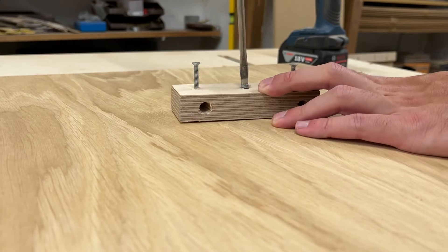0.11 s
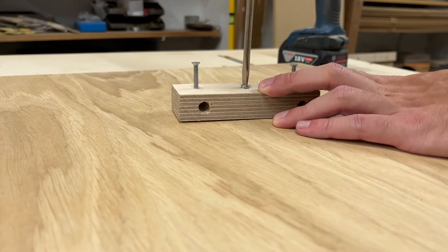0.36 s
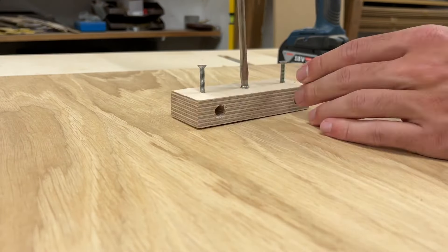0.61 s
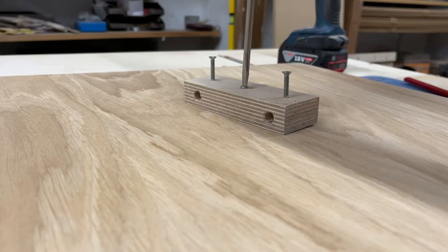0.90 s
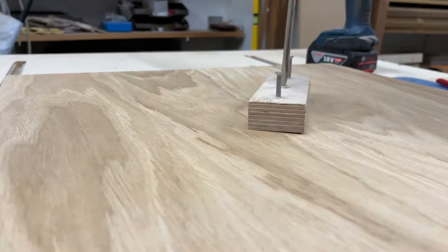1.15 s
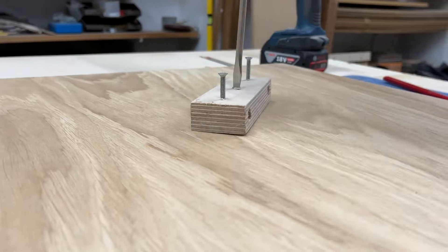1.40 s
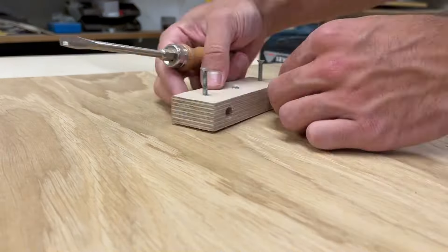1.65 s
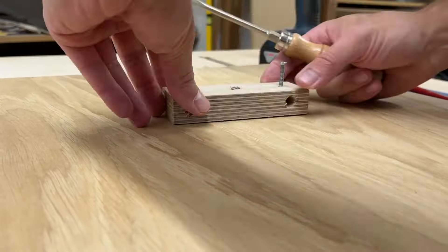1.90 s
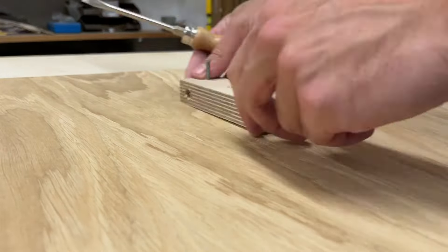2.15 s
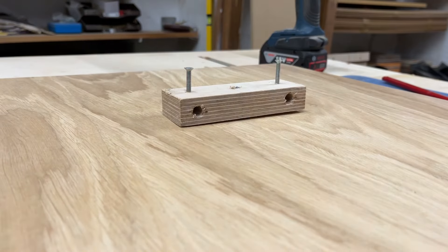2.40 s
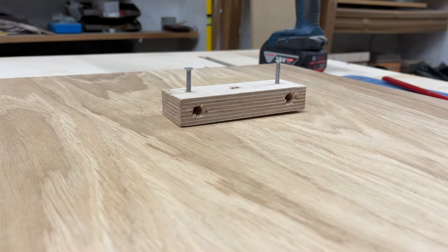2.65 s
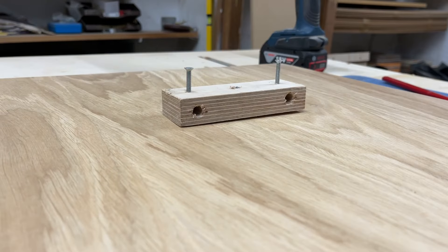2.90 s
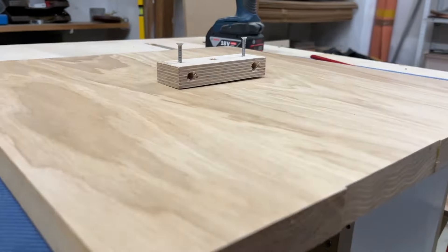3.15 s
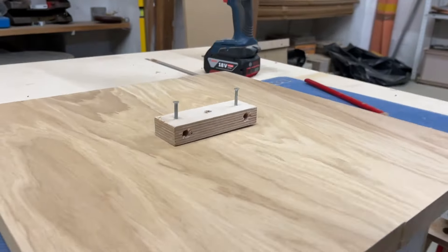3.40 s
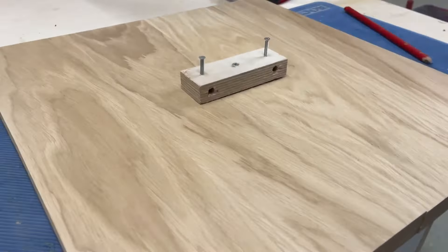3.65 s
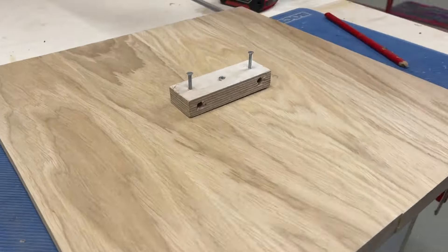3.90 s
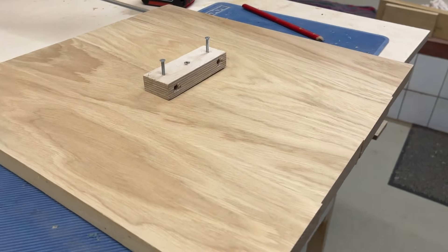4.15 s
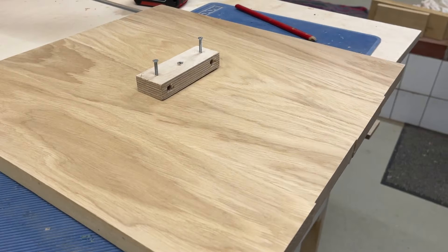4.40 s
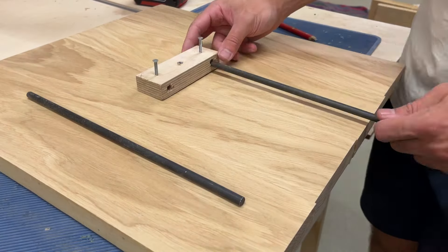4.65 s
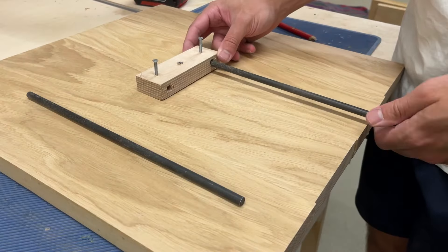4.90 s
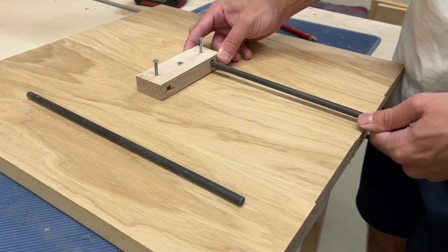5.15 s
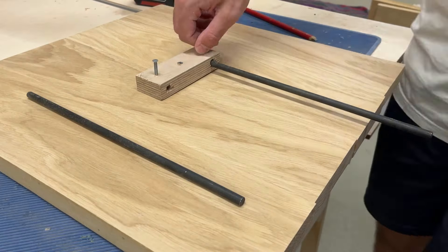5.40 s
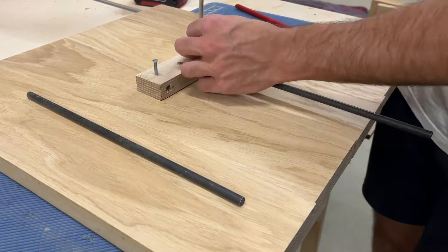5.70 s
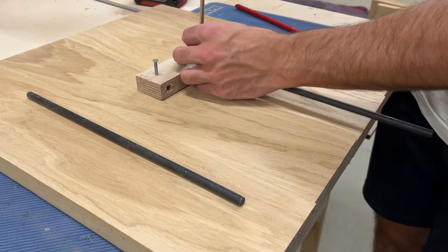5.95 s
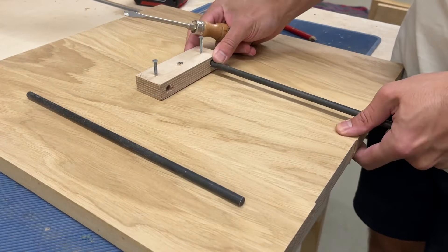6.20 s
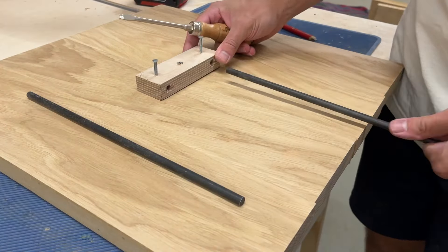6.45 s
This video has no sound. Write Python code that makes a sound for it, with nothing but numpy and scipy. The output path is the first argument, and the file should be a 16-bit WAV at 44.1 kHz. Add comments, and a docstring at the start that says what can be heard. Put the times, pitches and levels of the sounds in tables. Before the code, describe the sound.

Sped-up workshop handling: quick dry taps and knocks on a plywood block, soft hand rubs, a sharp clack, then steel rods clinking and near quiet.

```python
"""Impacts lead: tools tap and knock at a plywood block on a thick board, as filtered noise puffs. A steel rod
rings in damped bending modes; skin and wood rub in short strokes of coloured noise. A screw turns with gritty
slips through resonances, above the low shaking and jolts of the bench. The quiet workshop is heard at several
times real speed, so each blow is squeezed into a brief puff. A small stereo microphone stands on the board; its
channels agree by a different amount at each frequency."""
import sys
import numpy as np
from scipy import signal
from scipy.fft import rfft, irfft, next_fast_len
from scipy.io import wavfile
from scipy.ndimage import uniform_filter1d

SR = 44100
rng = np.random.default_rng(int(sys.argv[2]) if len(sys.argv) > 2 else 0)


def ratio_of_db(decibels):
    """Turn decibels (scalar or array-like) into linear amplitude factors; 0 dB maps to 1."""
    return 10 ** (np.asarray(decibels, float) / 20)


def inscribe(sig):
    """Save sig as 16-bit PCM at rate SR to the path in sys.argv[1].

    A 1-D sig is mono; a 2-D sig holds one channel per row.
    Samples are clipped to [-1, 1] before scaling.
    """
    pcm = np.round(np.clip(np.atleast_2d(sig).T, -1, 1) * 32767)
    wavfile.write(sys.argv[1], SR, pcm.astype(np.int16))


N = 289296  # samples

# Dull knocks of wood and knuckle; levels are relative, the thud of the board to its own blow
# [t/s, level/dB, thud level/dB, main ring f/Hz, rise length/s]
WOOD_KNOCKS = [(.0596, -29.5, -8.5, 2630, 0.0012), (0.2927, -39.5, 0, 1300, 0.0048),
               (0.415, -34, 1, 660, 0.0056), (0.667, -36.5, 3.5, 594, 0.00091),
               (0.901, -43, -31.5, 1300, 0.0075), (1.231, -39.5, -2.5, 670, 0.00079),
               (1.315, -47, 10.5, 1260, 0.0026), (1.5233, -38.5, -0.5, 616, .0027),
               (2.542, -55, 19.5, 1090, 0.0065), (2.647, -54, 17, 710, 0.0022),
               (2.685, -60, 20.5, 665, 0.0011), (2.887, -29.5, -3, 1530, .017),
               (2.9024, -16, -20.5, 1060, 0.0032), (2.9125, -21, -5, 1165, 0.003),
               (2.927, -28.5, -2.5, 1530, .0039), (2.932, -30.5, -7, 1100, 0.0056),
               (3.236, -43, 0.5, 760, .0047), (3.593, -61.5, 11.5, 600, 0.0033),
               (4.2394, -41.5, 9, 1770, 0.0087), (4.314, -42.5, -3, 735, .0039),
               (4.342, -46.5, -12.5, 1800, 0.0055), (4.5223, -34, -20, 1450, .011),
               (4.542, -27, -9, 1320, 0.0058), (4.5425, -25, -21.5, 2130, 0.0062),
               (4.868, -61.5, -9.5, 1450, 0.0036), (5.103, -44, -12.5, 1068, 0.0053),
               (5.695, -35, -4.5, 1360, 0.0042), (5.91, -60.5, -16.5, 844, 0.0058),
               (5.943, -55.5, -14, 1340, 0.0069), (6.241, -55, -7, 1580, 0.00059)]
# Taps of a hard edge [t/s, level/dB, thud level/dB, main ring f/Hz, rise length/s]
EDGE_TAPS = [(.0072, -19.5, -27.5, 3140, 0.0014), (0.1268, -25, -20.5, 4700, 0.00073),
             (.18, -39.5, -3.5, 1970, 0.0045), (0.2358, -38, -3, 3380, 0.004),
             (0.3548, -30.5, -3, 700, 0.001), (0.4257, -17.5, -19.5, 2590, 0.0013),
             (0.4895, -44, 8.5, 3300, 0.0043), (0.5673, -46, 5.5, 1290, 0.003),
             (0.6936, -47.5, 8, 590, 0.0046), (0.769, -52.5, 7.5, 4200, 0.0077),
             (1.0304, -48, 4, 1570, 0.0036), (1.108, -41.5, 17, 4640, 0.0024),
             (1.1921, -33, -3, 4540, 0.0032), (1.257, -44.5, -5.5, 1210, .0014),
             (1.3336, -45, 12.5, 1780, 0.0078), (1.3517, -24.5, -27.5, 2680, 0.0005),
             (1.382, -48, 1.5, 1300, 0.0081), (1.4502, -23.5, -26, 2670, 0.00032),
             (1.515, -42.5, 0.5, 1010, 0.00041), (1.895, -48.5, -34, 3560, 0.0017),
             (1.915, -46, -33, 3800, 0.0031), (2.069, -45, -15, 1490, .0058),
             (2.486, -58, -9, 4420, 0.0055), (2.805, -67, -8, 4040, 0.0048),
             (2.836, -56, 0.5, 1530, 0.0045), (3.044, -52.5, -22.5, 4620, 0.0047),
             (3.1033, -49, 13, 690, .0081), (3.15, -54.5, 13.5, 3980, .0031),
             (3.3062, -43.5, -1.5, 900, 0.003), (3.4027, -50.5, 13, 595, 0.0043),
             (3.5122, -40.5, 0, 4780, 0.0054), (3.661, -49, 8, 4400, 0.0012),
             (3.6943, -46, 7.5, 4950, 0.0037), (3.769, -60, -15, 4000, 0.00089),
             (3.7993, -36.5, -6.5, 4300, 0.0004), (3.8542, -43.5, -5, 4720, 0.00038),
             (4.041, -47.5, 11.5, 3600, 0.0056), (4.093, -46.5, 10.5, 596, 0.0038),
             (4.425, -59.5, -6.5, 4070, 0.0077), (4.5047, -52.5, -8, 3750, 0.0041),
             (4.541, -27, -32, 3930, 0.0068), (4.626, -58, -18.5, 5030, 0.0051),
             (5.141, -61.5, -15, 3020, 0.003), (5.432, -66.5, 0.5, 2200, 0.0047),
             (5.5, -68, -10, 2000, 0.0051), (5.635, -61.5, -5, 3710, 0.0056),
             (5.674, -58.5, -8.5, 2000, 0.0023), (6.0657, -54, -13, 730, 0.0044),
             (6.495, -66, -17, 4800, 0.0045)]


def blows():
    """Contact stiffness: a hard edge gives more tick than wood, and more still with a higher ring."""
    knocks = [(s, db, thud_db, -28.5, hz, length) for s, db, thud_db, hz, length in WOOD_KNOCKS]
    edges = []
    for s, db, thud_db, hz, length in EDGE_TAPS:
        tick_db = -4.5 + 4.5 * np.log2(hz / 4000)  # 4.5 dB per octave
        edges.append((s, db, thud_db, tick_db, hz, length))
    return knocks + edges


# Spectrum of fine contact, in the ticks and in the rubbing [f/Hz, level/dB]
HISS_COLOUR = [(2000, -30), (6500, -6), (8500, -1), (11000, -2), (14500, -8), (16000, -22)]
# Spectrum of the board thudding under a blow [f/Hz, level/dB]
THUD_COLOUR = [(60, -10.5), (180, 4), (450, 0.5), (800, -9), (2000, -53)]


def taps():
    """Impact excitation: a puff of tiny contacts gives thud, body with its ring, tick and a faint smear."""
    out = np.zeros((2, N))
    for s, db, thud_db, tick_db, hz, length in blows():
        grit = rng.standard_normal((4, 2, 4096))
        # a hard edge or a strong blow carries the body higher up
        edge_db = 0.69 * min(tick_db, 0) + 0.23 * (db + 42.0)
        colour = [(hz / 6, -14.), (hz, -1.5), (6000, edge_db - 5.0), (9000, edge_db - 32.5), (20000, -70)]
        body = puff(coloured(grit[0], colour), length)
        rung = ring(body, hz, hz / 8)
        rung *= 0.71 * np.std(body) / np.std(rung)
        tick = ratio_of_db(tick_db) * puff(coloured(grit[1], HISS_COLOUR), length)
        # the board answers slower
        thud = ratio_of_db(thud_db) * puff(coloured(grit[2], THUD_COLOUR), length + 0.0021)
        add(out, s, ratio_of_db(db - 3.0) * (body + rung + tick + thud))
        smear = puff(coloured(grit[3], colour), length + 0.004)
        add(out, s - .004, ratio_of_db(db - 25.0) * smear)
    return out


# Blows on a steel rod; the struck spot favours modes near one frequency
# [t/s, relative level/dB, favoured f/Hz, rise length/s, reference t60/s]
ROD_HITS = [(2.592, -36, 7000, 0.0052, 0.04), (2.64, -87, 6000, 0.0037, 0.027),
            (2.71, -54.5, 6800, 0.0051, 0.045), (2.902, -51.5, 5500, 0.0024, .04),
            (2.908, -21, 13400, 0.0069, 0.025), (2.925, -49, 6000, 0.0057, 0.028),
            (4.24, -21, 10200, 0.0041, 0.055), (4.272, -30, 10100, 0.0039, 0.018),
            (4.305, -54.5, 5260, 0.0046, .04), (4.343, -49, 10000, 0.0042, 0.018),
            (4.546, -22.5, 9100, 0.0031, .065)]
# Bending modes of the rod [f/Hz, relative level/dB, share of the reference t60]
ROD_MODES = [(2280, -8, .6), (3612, 5, .8), (5332, -1, .8), (7374, -2, 1), (9720, 0, 1), (12340, 0, .65),
             (15230, -7, .6)]


def rod():
    """Modal synthesis: a rattling contact drives the bending modes; hand and board damp them."""
    out = np.zeros((2, N))
    for s, db, favoured_hz, length, t60 in ROD_HITS:
        rattle = puff(rng.standard_normal((len(ROD_MODES), 2, 6000)), length)
        rings = 0
        for push, (hz, level_db, share) in zip(rattle, ROD_MODES):
            width = np.log(1000) / np.pi / (share * t60)  # bandwidth in Hz for this decay time
            mode_db = level_db - 7 * np.log2(hz / favoured_hz) ** 2
            rings = rings + ratio_of_db(mode_db) * evened(ring(push, hz, width))
        add(out, s, ratio_of_db(db - 23) * rings)
    return out


# Strokes of hands, block and cloth; hollow part and hiss are relative to the scrape
# [t/s, length/s, scrape level/dB, hollow level/dB, hiss level/dB]
HAND_STROKES = [(0.0, 0.09, -52, 4.5, -11.5), (0.1, 0.1, -61.5, 2.5, -39), (0.2, 0.07, -53, -4.5, -25),
                (0.274, 0.067, -57, -6.5, -10.5), (0.339, 0.21, -64.5, 1.5, -12),
                (0.459, 0.1, -60.5, 12.5, -26.5), (0.611, 0.089, -53, 0.5, -4),
                (0.743, 0.053, -56, 5.5, -40), (0.808, 0.074, -52.5, 0.5, -7.5), (0.95, 0.079, -67, 1, -5),
                (1.03, 0.14, -48, 1.5, -19), (1.175, 0.088, -50.5, 8, -25), (1.312, 0.17, -59.5, 4, -15),
                (1.492, 0.058, -68.5, 4, 2), (1.576, 0.16, -57, -9.5, -7.5),
                (1.821, 0.13, -46.5, -18, -11.5), (1.973, 0.062, -47, -7.5, -12),
                (2.055, 0.037, -74, 13, -20), (2.155, 0.094, -44.5, -11, -12), (2.27, 0.086, -88, 11, 10),
                (2.38, 0.097, -55.5, 2.5, -27), (2.522, 0.031, -75.5, 24.5, -30),
                (2.634, 0.14, -70.5, 11.5, -40), (2.77, 0.067, -92, -3, -25), (2.87, 0.031, -65, 13, -34.5),
                (2.96, 0.13, -70.5, -9, -9.5), (3.046, 0.11, -47.5, -4, -10.5),
                (3.21, 0.065, -70.5, 7, -24), (3.28, 0.2, -59.5, -4.5, -3.5), (3.46, 0.091, -56, -1.5, -11),
                (3.577, 0.18, -62, -1, -13), (3.764, 0.051, -74.5, 12, -26),
                (3.836, 0.085, -52.5, -4.5, -22), (3.934, 0.064, -46, -15.5, -14),
                (4.003, 0.086, -49.5, 0, -19), (4.131, 0.05, -60, -16, -10),
                (4.21, 0.096, -62, -5.5, -14.5), (4.303, 0.073, -59.5, 1.5, -22),
                (4.4, 0.06, -73.5, -2.5, -13), (4.47, 0.06, -65, 4, -21.5), (4.57, 0.09, -67, 2.5, -17),
                (4.69, 0.12, -80, 17, -19), (4.841, 0.05, -77.5, 11.5, -11.5),
                (4.906, 0.095, -70, 12.5, -16.5), (5.03, 0.046, -74, 14, -12),
                (5.088, 0.125, -69, 14.5, -17.5), (5.231, 0.045, -72.5, 11.5, -10.5),
                (5.336, 0.055, -73, 15, -14.5), (5.44, 0.17, -78.5, 0.5, -9), (5.555, 0.097, -57, 4.5, -19),
                (5.672, 0.031, -69, -8, -11), (5.765, 0.12, -76.5, 12.5, 9.5), (5.889, 0.095, -78.5, 15, 9),
                (6.011, 0.087, -71.5, 7.5, 1), (6.13, 0.05, -78.5, 7, -9.5), (6.257, 0.07, -76, 15.5, -16),
                (6.345, 0.065, -78.5, 14, -5.5), (6.435, 0.12, -74, 15.5, -11.5)]
# Shaking carried through the bench; it also sets the resting hand's rub [t/s, relative level/dB]
BENCH_SHAKING = [(0.0, -46), (1.02, -52.5), (1.46, -56), (2.61, -52), (2.87, -61), (3.51, -48), (3.67, -52),
                 (3.82, -58.5), (4.04, -64.5), (4.49, -55.5), (4.68, -59), (4.88, -65.5), (5.44, -69.5),
                 (5.79, -63.5), (6.01, -77), (6.56, -68)]


def pressure():
    """Contact force: each soft-edged stroke swells over the resting hand; gains of scrape, hollow, hiss."""
    rest_db = np.array([[-23.5], [-17], [-37]])  # hand on the board, against the shaking
    room_db = np.array([[-94], [-80], [-95]])  # quiet room in the same three colours
    swell_db = np.array([[5.5], [2.5], [5.]])  # the middle of a stroke presses harder
    edge = .015  # s
    t = np.arange(N) / SR
    gains = ratio_of_db(rest_db) * curves(BENCH_SHAKING)[0] + ratio_of_db(room_db)
    for s, length, db, hollow_db, hiss_db in HAND_STROKES:
        span = slice(max(round((s - edge) * SR), 0), round((s + length + edge) * SR))
        u = t[span] - s
        ends = np.clip(.5 + np.minimum(u, length - u) / edge / 2, 0, 1) ** 2
        swell = ratio_of_db(swell_db * (np.sin(np.pi * np.clip(u / length, 0, 1)) - 2.0))
        gains[:, span] += ratio_of_db(db + np.array([[0], [hollow_db], [hiss_db]])) * ends * swell
    return gains


# Spectrum of the scraping surface [f/Hz, level/dB]
SCRAPE_COLOUR = [(300, -23.5), (1200, 10.5), (1900, 7.5), (2800, 2), (4300, 2.5), (6500, -7), (9000, -24),
                 (16000, -41.5)]
# Spectrum of the hollow part from the board [f/Hz, level/dB]
HOLLOW_COLOUR = [(200, -17), (450, -1.5), (640, 2), (820, 0.5), (1050, -4), (1500, -10), (2200, -23.5),
                 (8000, -50)]


def rubbing():
    """Friction noise: three colours share one uneven contact; fibres that catch add a fine crackle."""
    contact = flicker(depth_db=2.8, hz=30)
    catches = ratio_of_db(4.5 * np.minimum(rng.exponential(1, N), 4)) * (rng.random(N) < 150 / SR)  # 150 a second
    crackle = evened(signal.lfilter([1], [1, -np.exp(-1 / (.0012 * SR))], catches))  # 1.2 ms decay
    noise = patches(rng.standard_normal((3, 2, N)), depth_db=1.6)
    colours = (SCRAPE_COLOUR, HOLLOW_COLOUR, HISS_COLOUR)
    rub = sum(gain * coloured(part, colour) for gain, colour, part in zip(pressure(), colours, noise))
    return contact * evened(1 + 0.42 * crackle) * rub


# A screw turning against the rod [t/s, relative level/dB]
SCREW_TURN = [(5.77, -80), (5.80, -73), (6.0, -73), (6.06, -76), (6.085, -100)]
# Resonances that the screw sets ringing [f/Hz, bandwidth of each pass/Hz, relative level/dB]
SCREW_RINGS = [(800, 300, 10.), (2400, 500, 0.), (4250, 500, 0.), (6300, 900, -4.)]


def turning():
    """Stick-slip: gritty slips of the thread pass twice through each of several broad resonances."""
    slips = rng.standard_normal((2, N)) * flicker(depth_db=6.5, hz=60)
    rings = sum(ratio_of_db(db) * evened(ring(ring(slips, hz, width), hz, width)) for hz, width, db in SCREW_RINGS)
    before = (SCREW_TURN[0][0] - .03, -120)
    after = (SCREW_TURN[-1][0] + .03, -120)
    return curves([before] + list(SCREW_TURN) + [after])[0] * rings


# Spectrum of the deep part of the shaking [f/Hz, level/dB]
DEEP_COLOUR = [(15, -14.5), (40, -5.5), (75, 2.5), (110, -5.5), (200, -23.5), (500, -79)]
# Spectrum of the middle part of the shaking and of the grinding screw [f/Hz, level/dB]
GRIND_COLOUR = [(60, -31.5), (110, -5.5), (165, 1), (220, -5.5), (330, -11.5), (450, -18.5), (1000, -49.5)]
# Single jolts of the bench [t/s, relative level/dB, f/Hz]
BENCH_JOLTS = [(1.101, -27.5, 49), (3.521, -38, 60.1)]


def bench():
    """Structure-borne sound: lumpy low shaking, and jolts that push the microphone down and back once."""
    noise = rng.standard_normal((2, 2, N))
    t = np.arange(N) / SR
    shaking = curves(BENCH_SHAKING)[0]
    # the bench shudders just after each knock, with a spread of 24 ms
    shudder = sum(ratio_of_db(db + thud_db - 16.5) * np.exp(-((t - s) / 0.024 - .5) ** 2)
                  for s, db, thud_db, *_ in WOOD_KNOCKS)
    deep = ratio_of_db(2.5) * shaking * flicker(depth_db=2.5, hz=3.5) + shudder
    screw = ratio_of_db(-40 - 20.5 * t)  # it grinds less as it seats: 20.5 dB per second
    grind = (ratio_of_db(-5.5) * shaking + screw) * flicker(depth_db=3.0, hz=25)
    jolts = np.zeros(N)
    for s, db, hz in BENCH_JOLTS:
        cycles = hz * (t - s)
        jolts -= ratio_of_db(db) * np.cos(2 * np.pi * cycles) * np.exp(-2 * cycles ** 2)
    return deep * coloured(noise[0], DEEP_COLOUR) + grind * coloured(noise[1], GRIND_COLOUR) + jolts


def evened(x):
    """Power normalisation: scales to rms 1."""
    return x / np.sqrt(np.mean(x ** 2) + 1e-20)


def coloured(x, points):
    """Spectral shaping: filters by (f/Hz, level/dB) points, joined over log frequency; rms 1."""
    hz, db = np.transpose(points)
    grid = np.fft.rfftfreq(x.shape[-1], 1 / SR) + 1  # 1 Hz up, to keep the logarithm finite
    gain = ratio_of_db(np.interp(np.log(grid), np.log(hz), db))
    return evened(irfft(rfft(x) * gain, x.shape[-1]))


def ring(x, hz, width):
    """Damped resonance: two poles at hz, with a bandwidth of width Hz."""
    r = np.exp(-np.pi * width / SR)
    angle = 2 * np.pi * hz / SR
    return signal.lfilter([1 - r], [1, -2 * r * np.cos(angle), r * r], x) * 2 * np.sin(angle)


def puff(noise, length):
    """Impulse envelope: noise swells for the given length in s, then falls; rms 1 at the top."""
    u = np.arange(noise.shape[-1]) / SR / np.clip(length, .0003, .03)
    shape = (u * np.exp(1 - u)) ** 2
    shaped = noise * shape
    return shaped * np.sqrt(np.sum(shape ** 2) / np.sum(shaped ** 2, -1, keepdims=True))


def add(mix, s, sound):
    """Superposition: adds a sound to the mix from time s."""
    part = mix[:, max(round(s * SR), 0):][:, :sound.shape[1]]
    part += sound[:, :part.shape[1]]


def curves(rows):
    """Amplitude envelope: one gain per dB column, joined by straight lines in amplitude."""
    s, *columns = np.transpose(rows)
    return [np.interp(np.arange(N) / SR, s, ratio_of_db(c)) for c in columns]


def flicker(depth_db, hz):
    """Amplitude modulation: a random gain from noise low-passed at hz, as of uneven contact."""
    wobble = signal.lfilter(*signal.butter(2, hz, fs=SR), rng.standard_normal(N))
    return evened(ratio_of_db(depth_db * evened(wobble)))


def patches(noise, depth_db):
    """Time-varying filtering: colour shifts with the grain, in random patches of some 700 Hz by 40 ms."""
    z = signal.stft(noise, nperseg=256, noverlap=192)[2]
    field = rng.standard_normal(z.shape[-2:])
    field = uniform_filter1d(uniform_filter1d(field, size=4, axis=0), size=28, axis=1)
    shifted = signal.istft(z * ratio_of_db(depth_db * evened(field)), nperseg=256, noverlap=192)[1]
    return evened(shifted[..., :N])


def scene():
    """Linear superposition: two channels of independent noise under shared envelopes, and common jolts."""
    return taps() + rod() + rubbing() + turning() + bench()


# Stereo relation of the microphone's two ports
# [f/Hz, left-right likeness 0-1, phase lead of left/rad, left minus right level/dB]
STEREO_PAIR = [(0, 1, -0.1, 1.5), (120, 0.98, 0.38, 1.75), (310, 0.66, -0.94, 1.5), (900, 0, -0.5, 0.5),
               (1530, 0.8, -1.83, 1.5), (2000, 1, 0.52, 1.5), (3270, 0.27, 1., 6), (4770, 1, 1.27, 6),
               (6140, 0, 0.5, 3.5), (7970, 1, -3, -1.5), (8710, 1, -3, 1.5), (10000, 0.16, -5, -0.1),
               (12800, 0.7, -7, -0.4), (14200, 0.8, -8, -0.5), (15300, .95, -9.5, -1), (17000, .9, -10, 0)]


def stereo(dry):
    """Partial coherence: right shares part of left, phase-shifted by the port spacing; band-limited."""
    size = next_fast_len(N + SR // 10)
    hz = np.fft.rfftfreq(size, 1 / SR)
    f, *columns = np.transpose(STEREO_PAIR)
    same, lead, balance_db = (np.interp(hz, f, c) for c in columns)
    same = np.clip(same, 0, 1)
    left, other = rfft(dry, size) / (1 + (hz / 16200) ** 100)  # steep low-pass at 16.2 kHz
    right = same * np.exp(-1j * lead) * left + np.sqrt(1 - same ** 2) * other
    half = ratio_of_db(balance_db / 2)
    return irfft(np.array([left * half, right / half]), size)[:, :N]


def band_limit(x):
    """A steep low-pass at the top of the band."""
    return signal.sosfilt(signal.butter(12, 16820, fs=SR, output="sos"), x)


def record(dry):
    """Two-port pickup: the scene takes on the stereo relation of the microphone."""
    mix = stereo(dry)
    return band_limit(mix)


dry = scene()
out = record(dry)
inscribe(out)
```